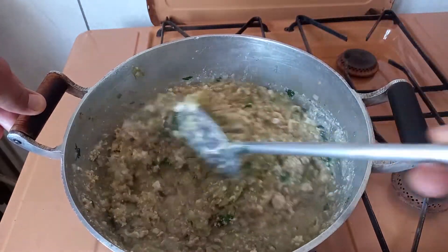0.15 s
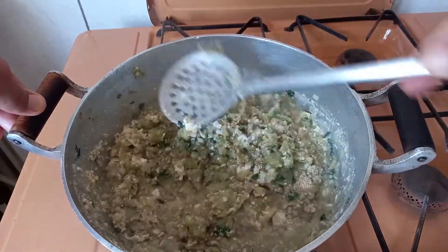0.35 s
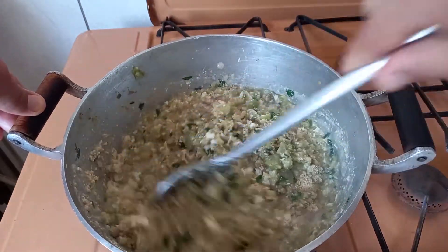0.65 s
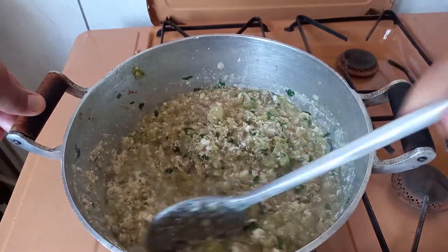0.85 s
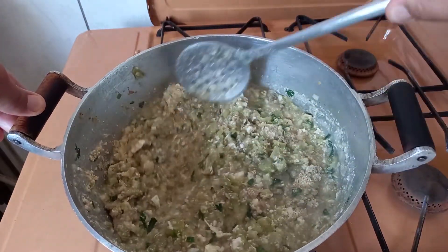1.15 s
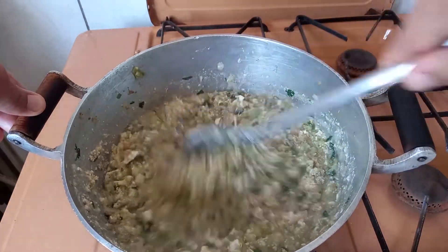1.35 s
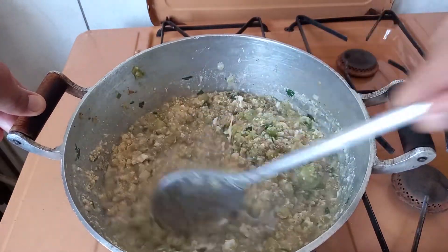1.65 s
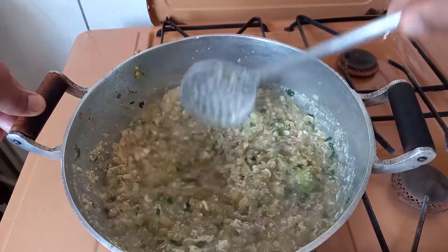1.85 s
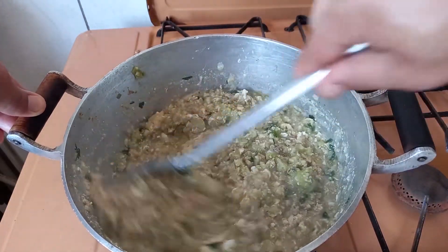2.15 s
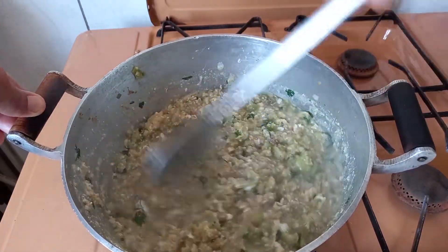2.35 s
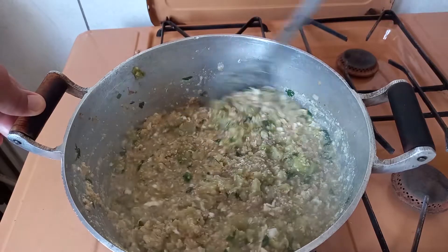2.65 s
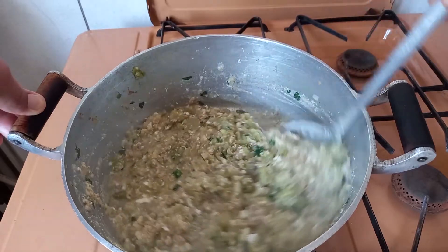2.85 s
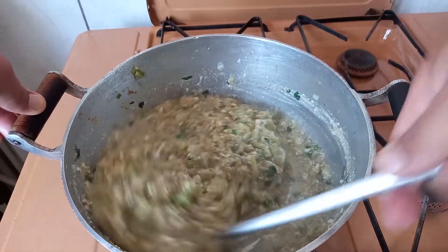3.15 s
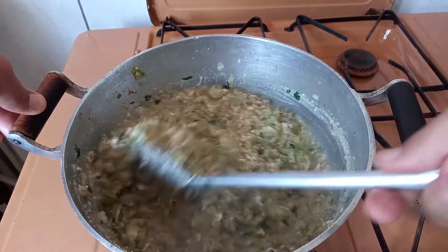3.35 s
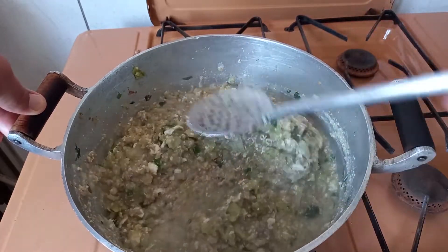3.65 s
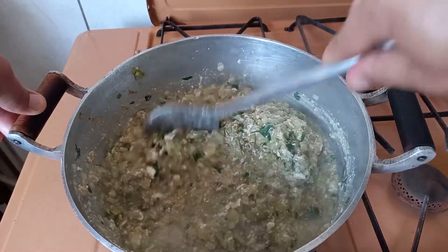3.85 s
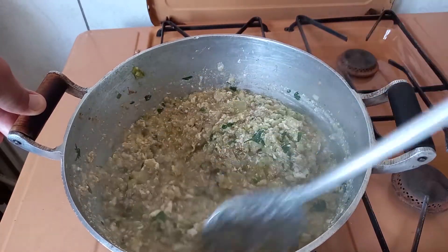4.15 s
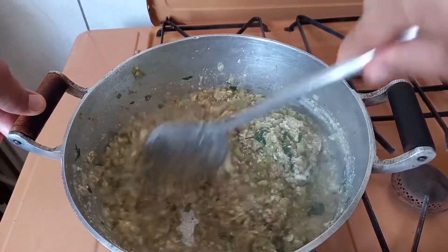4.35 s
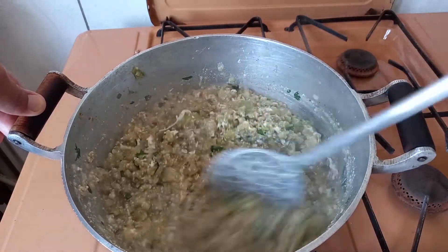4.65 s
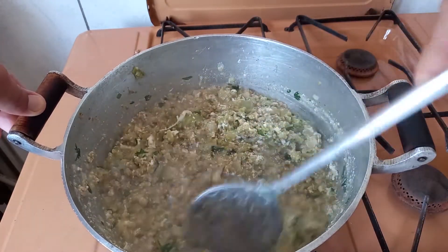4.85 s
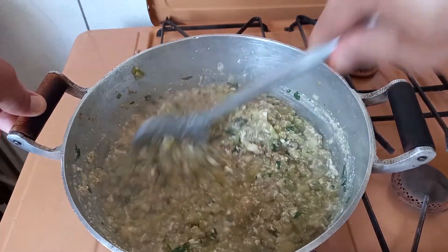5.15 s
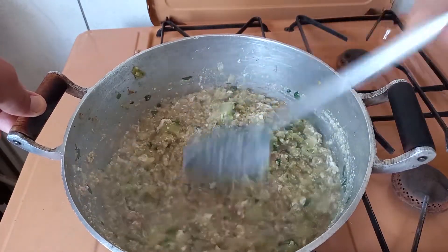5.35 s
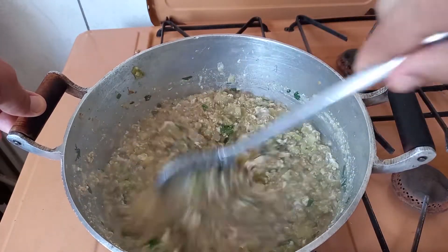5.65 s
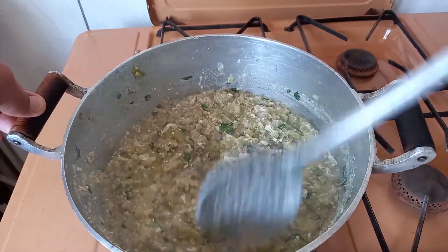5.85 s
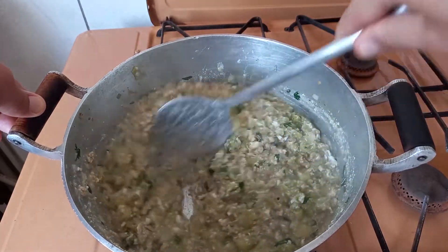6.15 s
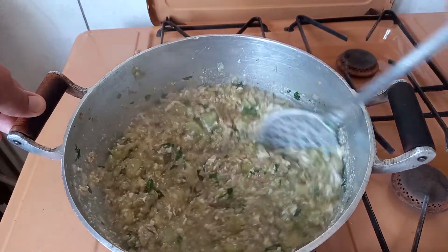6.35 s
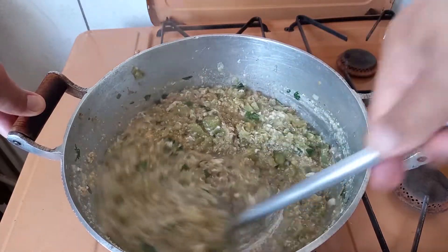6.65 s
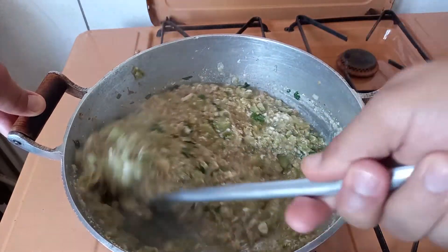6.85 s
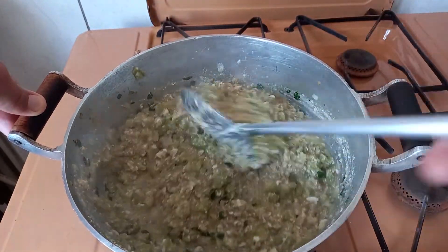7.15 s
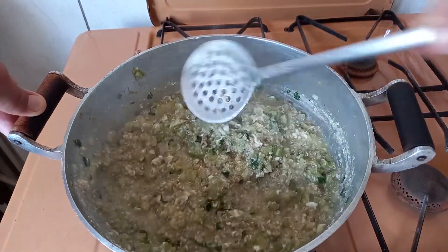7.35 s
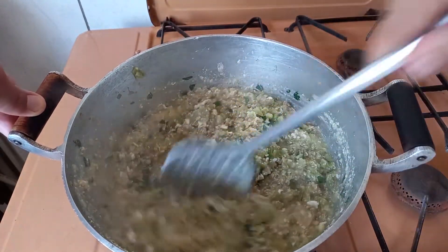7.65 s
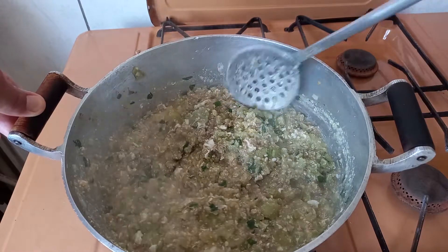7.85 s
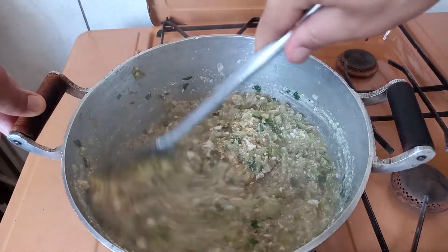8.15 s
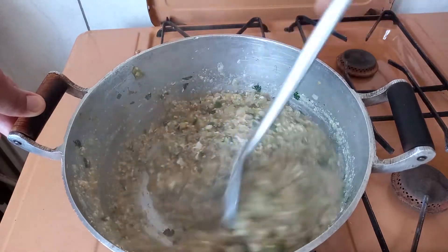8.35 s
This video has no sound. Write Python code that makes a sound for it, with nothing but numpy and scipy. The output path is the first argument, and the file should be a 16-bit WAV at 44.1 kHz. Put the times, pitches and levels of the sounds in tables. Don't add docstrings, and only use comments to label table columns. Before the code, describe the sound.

Stirring thick mash: hollow metallic clanks on a pot wall, gritty drags, squelchy clicks and faint crackle over a low household hum.

```python
import sys
import numpy as np
from scipy import signal
from scipy.io import wavfile

SR = 44100
rng = np.random.default_rng(int(sys.argv[2]) if len(sys.argv) > 2 else 0)


def amplitude_ratio(level_db):
    exponent = np.asarray(level_db, float) / 20
    return 10 ** exponent


def wav_record(signal):
    frames = np.transpose(np.atleast_2d(signal))
    bounded = np.clip(frames, -1, 1)
    quanta = np.round(bounded * 32767).astype(np.int16)
    wavfile.write(sys.argv[1], SR, quanta)


N = 374409

# f/Hz, level/dB, t60/s
POT_MODES = [(355, -4, 0.17), (387, -10.5, 0.048), (537, -1, 0.81), (526.3, 5.5, 0.47), (672, 11.5, 0.093),
             (581, 1, 0.073), (750, -20.5, .05), (855, -7.5, 0.14), (1034, 1.5, 0.57), (1171, 9, 0.042),
             (1253, 17.5, 0.022), (1424, 12, 0.027), (1660, 6, 0.03), (1914, -3, 0.03), (2072, -1.5, 0.17),
             (2415, -9.5, .1), (3155, -18, .06), (3400, 6.5, 0.14), (3830, -10.5, .04)]
# t/s, peak/dB, f/Hz, breadth (snap and body re peak)/dB
WET_SMACKS = [(0.0658, -40.5, 5130, -25), (0.068, -40, 1410, -25), (0.119, -55.5, 6600, -1),
              (0.3001, -47, 6000, -19), (1.652, -54, 3240, -30), (1.696, -60, 6170, -21),
              (2.2368, -48, 3200, -32), (2.501, -63, 6670, -27), (2.585, -55, 6120, -32),
              (3.265, -43, 6350, -17), (3.3199, -49.5, 5200, -17.5), (3.3662, -41, 2930, -10),
              (3.3628, -43, 4500, -30), (4.1727, -40, 4460, -14), (4.438, -61, 6380, -26.5),
              (4.563, -56.5, 5420, -32), (4.8435, -62, 6280, -16), (4.909, -58.5, 6240, -15.5),
              (5.1312, -61, 6650, -11), (5.1627, -53, 5550, -30), (5.5857, -57.5, 6240, -21.5),
              (5.606, -55, 5730, -24.5), (5.6566, -56.5, 5850, -19), (5.682, -58, 6040, 0),
              (6.9406, -55, 5990, -31.5), (6.984, -56, 5440, -16), (7.0166, -53.5, 3370, -29),
              (7.401, -61, 5640, -7.5), (7.4765, -49, 1220, -7.5), (8.4287, -59, 5530, -27)]


def rms_one(x):
    return x / np.sqrt(np.mean(x ** 2) + 1e-20)


def at_hz(points, hz):
    table_hz, values = np.array(points).T
    return np.interp(np.log(hz), np.log(table_hz), values)


def in_time(tables):
    t = np.arange(N) / SR
    out = np.zeros((2, N)) + [[-150], [0]]
    for rows in tables:
        s, *columns = np.transpose(rows)
        inside = (t >= s[0]) & (t <= s[-1])
        out[:, inside] = [np.interp(t[inside], s, c) for c in columns]
    return out


def filtered(sos, x):
    return signal.sosfilt(sos, x)


def band(x, low_hz, high_hz):
    limits_hz = [low_hz, np.clip(high_hz, 1.2 * low_hz, .45 * SR)]
    return filtered(signal.butter(2, limits_hz, "band", fs=SR, output="sos"), x)


def high_pass(x, order, hz):
    return filtered(signal.butter(order, hz, "high", fs=SR, output="sos"), x)


def ring(x, hz, t60):
    r, w = amplitude_ratio(-60 / (t60 * SR)), 2 * np.pi * hz / SR
    return signal.lfilter([0, np.sin(w)], [1, -2 * r * np.cos(w), r * r], x + 1e-18)


def grains(per_s, spread_db):
    sizes = amplitude_ratio(spread_db * np.minimum(rng.exponential(1, N), 5))
    signs = rng.choice([-1, 1], N)
    return sizes * signs * (rng.random(N) < per_s / SR)


def drift(per_s):
    steps = rng.standard_normal(400)
    return np.interp(np.arange(N) / SR * per_s % 399, np.arange(400), steps)


def swells(rows):
    attack_s = .012
    out, t = np.zeros(N + SR), np.arange(SR) / SR
    for s, db, t60 in rows:
        start = round(max(s, 0) * SR)
        out[start:][:SR] += np.minimum(t / attack_s, 1) * amplitude_ratio(db - 60 * t / t60)
    return out[:N]


def diffuse(size, gain_at):
    # f/Hz, left-right likeness/1
    likeness = [(30, .6), (70, 0.81), (150, 0.42), (300, 1), (600, 0.18), (1200, 0.2), (2500, 0.0092),
                (16000, .01)]
    edges_hz = 25 * 2 ** np.arange(0, 10, .5)
    white, out = rng.standard_normal((2, 2, size)), 0
    for k, (low, high) in enumerate(zip(edges_hz, edges_hz[1:])):
        mid, side = band(white[k % 2], low, high)
        hz = np.sqrt(low * high)
        alike = np.clip(at_hz(likeness, hz), -1, 1)
        stereo = np.sqrt(1 + alike) * mid + np.sqrt(1 - alike) * side * [[1], [-1]]
        out = out + gain_at(hz) * stereo
    return out


def hum():
    # f/Hz, level/dB
    hum_spectrum = [(15, -37), (25, -21), (70, 5), (373, -8), (476, -8.5), (531, -4.5), (887, -32.5),
                    (1330, -20), (1790, -48), (2760, -22.5), (3620, -42), (6560, -12), (7510, -49.5),
                    (11600, -40), (16000, -65.5)]
    # f/Hz, rms level/dB
    hum_tones = [(70.0, -70.5), (129.2, -75), (215.3, -100), (414.5, -82), (473.7, -74)]
    noise = amplitude_ratio(-67) * rms_one(diffuse(N, lambda hz: amplitude_ratio(at_hz(hum_spectrum, hz))))
    tones = sum(amplitude_ratio(db) * rms_one(ring(rng.standard_normal(N), hz, .7)) for hz, db in hum_tones)
    hiss = amplitude_ratio(-70.0 + 4.9 * drift(9.2)) * band(rng.standard_normal((2, N)), 5000, 13500)
    return noise + tones + hiss


def kitchen(x):
    # f/Hz, t60/s
    room_t60 = [(150, 1.4), (400, 0.66), (1040, 0.64), (2760, 0.54), (7280, 0.43)]
    # f/Hz, level/dB
    room_colour = [(58, 7.5), (125, 2.5), (270, 0.5), (480, 2), (770, -3.04), (1250, -6.7), (2000, -2),
                   (3400, -1.2), (6000, -4.9), (9200, -1.5), (14800, -13.5)]
    first_s, build_s = .002, 0.00057
    t = np.arange(SR) / SR
    tail = diffuse(SR, lambda hz: amplitude_ratio(at_hz(room_colour, hz) - 60 * t / at_hz(room_t60, hz)))
    tail = tail * np.clip((t - first_s) / build_s, 0, 1)
    return signal.fftconvolve(rms_one(tail) / np.sqrt(SR), x[None], axes=1)[:, :N]


def mash():
    # t/s, crackle
    # level/dB, slosh level/dB, t60/s
    folds = [(0.0, -48.5, -35.5, 0.15), (2.49, -68, -87.5, 0.13), (3.38, -61.5, -89, 0.13),
             (3.638, -97, -41, 0.11), (3.86, -62.5, -71, 0.27), (4.55, -71.5, -101.5, 1),
             (4.84, -64.5, -73.5, 0.79), (5.13, -73, -68.5, 0.33), (5.26, -80.5, -73, 0.38),
             (5.431, -65, -75.5, 0.4), (5.58, -73.5, -62, 0.54), (5.7, -76.5, -70.5, 0.188),
             (5.93, -74, -77, .5), (6.17, -62.5, -78, 0.55), (6.9, -63.5, -81, 0.54),
             (7.03, -58, -82, 0.35), (7.16, -77, -68.5, .3), (7.4, -77.5, -73.5, 0.41),
             (7.47, -62, -54, 0.46)]
    trail_db, trail_s = -8.5, 0.078
    rest_crackle_db, rest_slosh_db = -86, -94
    trails = [(s, db + trail_db, trail_s) for s, db, *_ in WET_SMACKS]
    crackling = swells([(s, db, t60) for s, db, _, t60 in folds] + trails)
    crackling = crackling + amplitude_ratio(rest_crackle_db + 4 * drift(27))
    slopping = swells([(s, db, t60) for s, _, db, t60 in folds])
    slopping = slopping + amplitude_ratio(rest_slosh_db + 5 * drift(15))
    pops, dealt = grains(per_s=1800, spread_db=0.5), rng.integers(0, 10, N)
    pitches_hz = np.geomspace(3800, 15000, 10)
    crackle = rms_one(sum(ring(pops * (dealt == k), hz, 8.2 / hz) for k, hz in enumerate(pitches_hz)))
    slosh = rms_one(band(band(grains(per_s=640, spread_db=4.0), 500, 1900), 300, 3100))
    return amplitude_ratio(-3.0) * crackling * crackle, amplitude_ratio(-9) * slopping * slosh


def smacks():
    crumb_times = [0.098, 0.266, .28, 1.909, 2.369, 2.459, 3.608, 4.463, 4.612, 4.867, 4.978, 5.144, 5.266,
                   5.429, 5.796, 5.948, 5.97, 6.043, 6.169, 6.194, 6.241, 6.284, 6.965, 7.069, 7.159, 7.808,
                   7.887]
    crumb_db, crumb_hz, crumb_breadth_db = -62, 6200, -27
    out, t = np.zeros(N + SR), np.arange(SR // 40) / SR
    crumbs = []
    for s in crumb_times:
        a, b, c = rng.standard_normal(3)
        crumbs.append((s, crumb_db + 2.5 * a, crumb_hz * (1 + .06 * b), crumb_breadth_db + 5 * c))
    for s, peak_db, hz, breadth_db in WET_SMACKS + crumbs:
        burst = rng.standard_normal(len(t)) * amplitude_ratio(-60 * t / 0.018)
        pocket = np.sin(2 * np.pi * hz * t) * amplitude_ratio(-60 * t / 0.0051)
        pocket = pocket + 1.4 * band(burst, 1507, 8400)
        snap_and_body = band(burst, 6300, 15000) + amplitude_ratio(-4) * band(burst, 700, 1800)
        snap_and_body = amplitude_ratio(min(breadth_db, -4) + 14) * snap_and_body
        out[round(s * SR):][:len(t)] += amplitude_ratio(peak_db + 7.0) * (pocket + snap_and_body)
    return out[:N]


def scrape():
    # t/s, pressure/dB, mash cushion/1
    drags = [
        [(2.635, -41.5, 0.33), (2.70, -40, 0), (2.77, -36, 0), (2.872, -39.5, 0.33), (2.918, -39, 0.14),
         (2.966, -41.5, 0.17), (3.04, -37, 0.24), (3.152, -38.5, 0), (3.28, -58.5, 0.14)],
        [(6.335, -35.5, 0.14), (6.387, -41, 0.5), (6.4, -39, 0.9), (6.451, -34.5, 0.07), (6.651, -38, 0.17),
         (6.717, -36, 0.35), (6.787, -54.5, 0.12), (6.81, -47, .05), (6.865, -47, 0.19)],
        [(7.985, -40, 0.5), (8.057, -39, .3), (8.075, -38, 0.05), (8.153, -32.5, 0.05), (8.191, -36.5, 0.04),
         (8.3, -69.5, 0.26)],
    ]
    bare_rasp_db, cushion_db = 4.5, 50.5
    chatter_db, chatter_per_s = 1.2, 45
    pressure_db, cushion = in_time(drags)
    wall_db = pressure_db + chatter_db * drift(chatter_per_s)
    rasp_db = wall_db + bare_rasp_db - cushion_db * np.clip(cushion, 0, 1)
    slips = grains(per_s=7500, spread_db=5.0)

    rings = sum(amplitude_ratio(db + 3.2 * drift(7)) * rms_one(ring(slips, hz, .5 * t60))
                for hz, db, t60 in POT_MODES)
    wall = band(amplitude_ratio(-2.0) * rms_one(rings) + rms_one(band(slips, 368, 2800)), 390, 7600)
    wall = wall + amplitude_ratio(-22.5) * rms_one(band(slips, 60.2, 190))

    own = np.array([grains(per_s=2900, spread_db=3.0), grains(per_s=6000, spread_db=2.0)])
    fine = slips + 2.0 * own
    rasp = amplitude_ratio(-9.5) * rms_one(band(fine, 6750, 21000)) - rms_one(band(fine, 1600, 8400))
    spoon = sum(amplitude_ratio(-12 + 4.3 * drift(8.9)) * rms_one(band(fine, hz, 1.246 * hz)) for hz in (3400, 5400))
    return amplitude_ratio(wall_db - 0.5) * wall, amplitude_ratio(rasp_db - 1.5) * (rasp - spoon)


def knocks():
    # t/s, thud/dB, clang/dB, tick/dB, favoured wall mode f/Hz
    blows = [(0.5651, -24.5, -19, -27, 615), (0.965, -26, -21, -24, 520),
             (1.3218, -23.5, -18.5, -25.5, 477), (1.737, -28.5, -31.5, -32.5, 590),
             (2.0095, -16, -12, -18.5, 481.5), (2.628, -46, -34, -41.5, 664),
             (3.8906, -16.5, -18.5, -25, 480.5), (6.326, -25, -29.5, -33, 484),
             (6.393, -38, -24, -22.5, 598), (7.5065, -14.5, -14.5, -18, 496), (7.97, -22, -24, -27.5, 480)]
    # low f/Hz, high f/Hz
    knock_bands = [(300, 800), (800, 2300), (2300, 7300), (7300, 18000)]
    # f/Hz, level/dB, t60/s
    grate = [(83, -31, .21), (128.1, -26.5, 0.48), (168, -29, 0.13), (237, -24, .1)]
    favour_db, favour_width = 6, .08
    load_detune, strike_spread_db = .01, 1.8
    bloom_s, longest_ring_s, most_cycles = 0.00075, .11, 80
    bounce_s, bounce_db, bounce_hz = .0095, -9, 1100
    landing = 40
    out, t = np.zeros(N + SR), np.arange(SR // 4) / SR
    tuned_hz, mode_db, t60 = np.transpose(grate + POT_MODES)[:, :, None]
    ring_s = np.minimum(t60, longest_ring_s)
    centres_hz = np.sqrt(np.prod(knock_bands, axis=1))
    since = np.maximum(t - landing / SR, 0)
    for s, *colour_db, favoured_hz in blows:
        hz = tuned_hz * (1 + load_detune * rng.standard_normal(tuned_hz.shape))
        favour = favour_db * np.exp(-(np.log(tuned_hz / favoured_hz) / favour_width) ** 2)
        strength_db = mode_db + favour + at_hz(list(zip(centres_hz, colour_db)), hz) - 15.5
        strength_db = strength_db + strike_spread_db * rng.standard_normal(hz.shape)
        phase = rng.uniform(0, 2 * np.pi, hz.shape)
        decay = amplitude_ratio(-60 * since / np.minimum(ring_s, most_cycles / hz))
        modes = (amplitude_ratio(strength_db) * decay * np.sin(2 * np.pi * hz * since + phase)).sum(axis=0)
        modes = high_pass(modes * np.minimum(since / bloom_s, 1), 1, 60)

        graze = amplitude_ratio(-27.5) * rng.standard_normal(len(t)) * amplitude_ratio(-60 * t / 0.03)
        contact = graze - (np.arange(len(t)) == landing)
        parts = [band(contact, low, high) for low, high in knock_bands]
        lift_db = np.append(colour_db, colour_db[-1]) + [4.2, 10.38, 17.1, 14.6]
        crack = sum(sign * amplitude_ratio(db) * x / np.abs(x).max()
                    for sign, db, x in zip([1, -1, 1, -1], lift_db, parts))
        crack = high_pass(crack, 4, 330)
        bounce = amplitude_ratio(bounce_db) * band(crack, 250, bounce_hz)
        bounce_at_s = s + bounce_s * rng.uniform(.85, 1.15)
        out[round(bounce_at_s * SR):][:len(t)] += bounce
        out[round(s * SR):][:len(t)] += modes + crack
    return out[:N]


def scene():
    right_late_s = .00018
    (wall, rasp), (crackle, slosh), blows = scrape(), mash(), knocks()
    crackle = crackle + smacks()
    left, right = blows + wall + rasp + slosh + crackle
    late = np.concatenate([np.zeros(round(right_late_s * SR)), right])[:N]
    to_walls = amplitude_ratio(-.7) * blows + amplitude_ratio(-6.5) * wall + amplitude_ratio(-16) * rasp
    to_walls = to_walls + amplitude_ratio(1.5) * slosh + amplitude_ratio(-16.5) * crackle
    return np.array([left, late]) + kitchen(to_walls[0]) + hum()


def roll_off(x):
    return signal.sosfilt(signal.butter(12, 16800, fs=SR, output="sos"), x)


def record(dry):
    edge_hz, top_hz, top_db, rumble_hz = 6900, 7900, -8, 43
    low = filtered(signal.ellip(8, .5, 50, edge_hz, fs=SR, output="sos"), dry)
    high = high_pass(dry, 6, top_hz)
    heard = high_pass(low + amplitude_ratio(top_db) * high, 3, rumble_hz)
    heard = filtered(signal.cheby2(16, 80, 16800, fs=SR, output="sos"), heard)
    ceiling = .96
    rounded = heard / (1 + (heard / ceiling) ** 6) ** (1 / 6)
    return roll_off(rounded)


dry = scene()
out = record(dry)
wav_record(out)
```